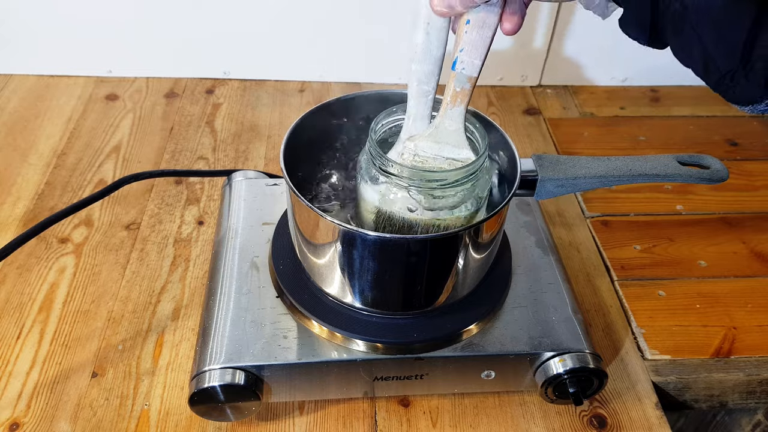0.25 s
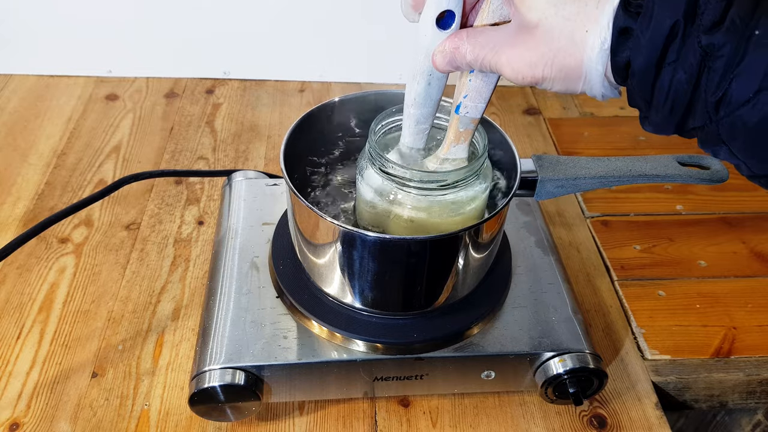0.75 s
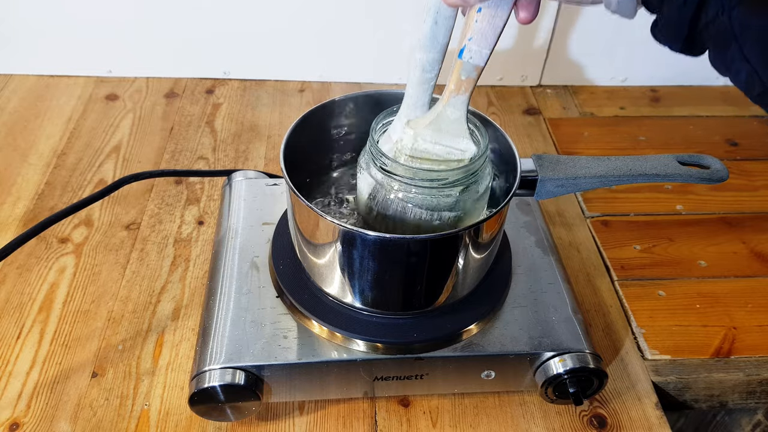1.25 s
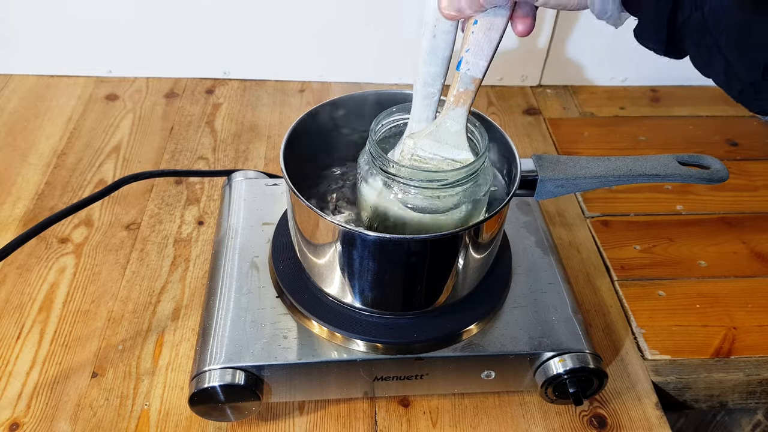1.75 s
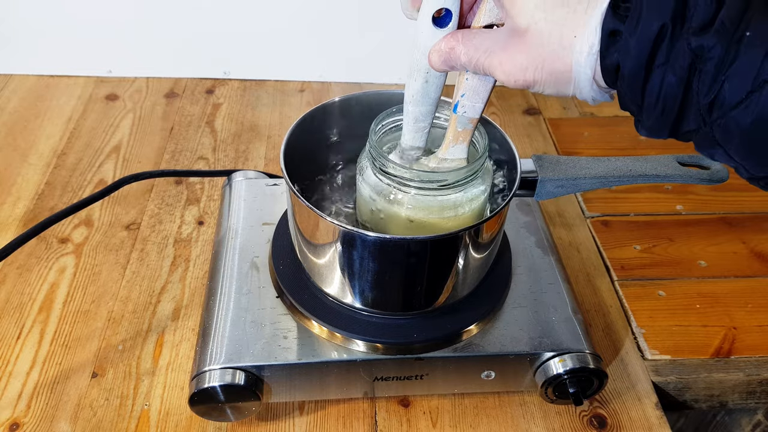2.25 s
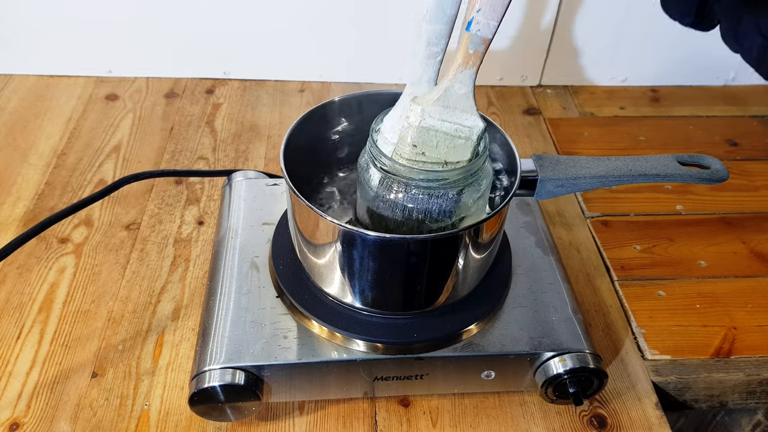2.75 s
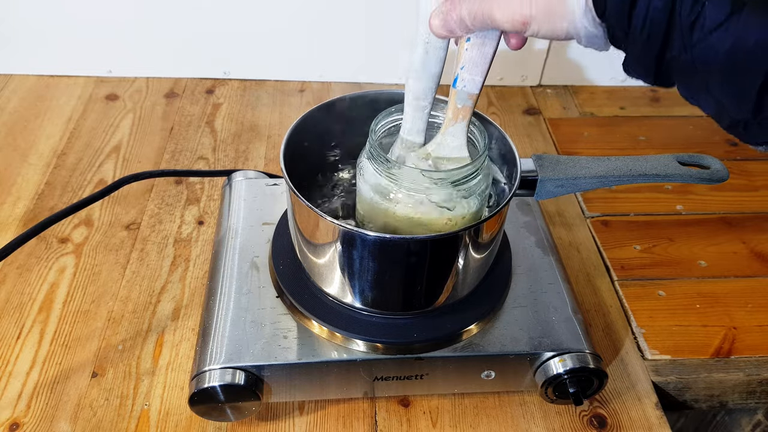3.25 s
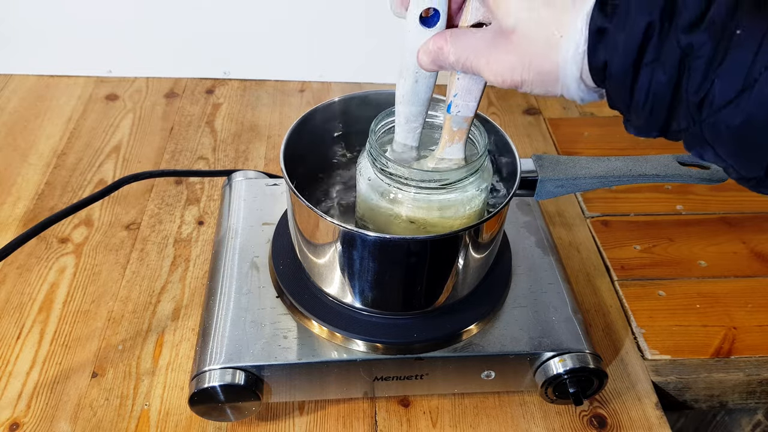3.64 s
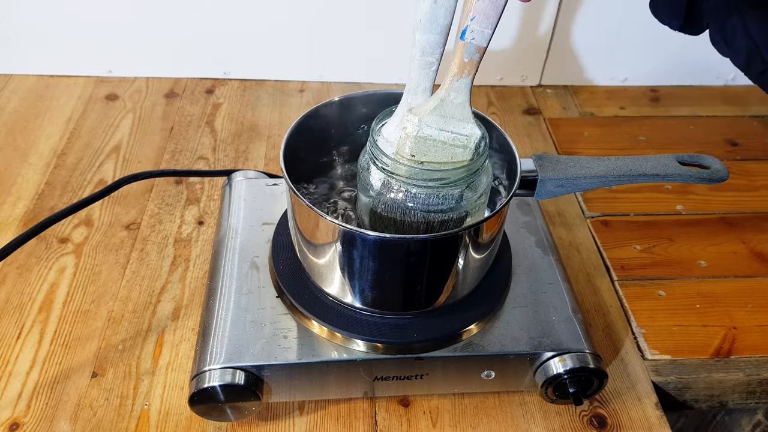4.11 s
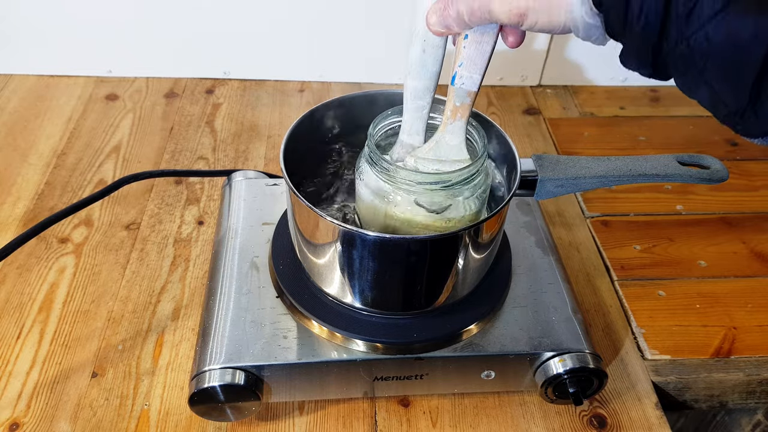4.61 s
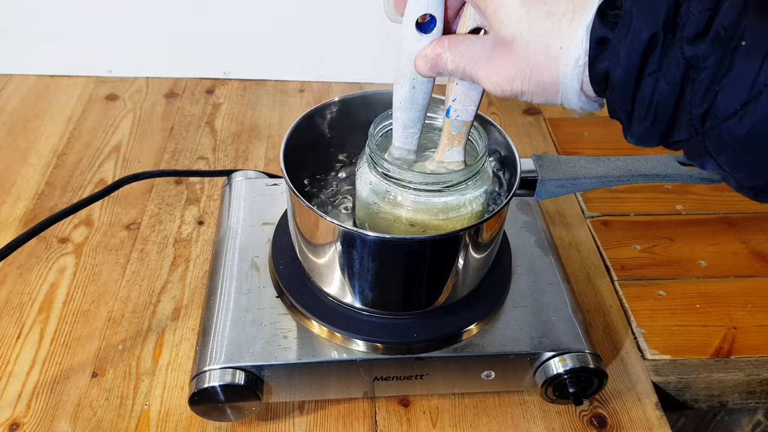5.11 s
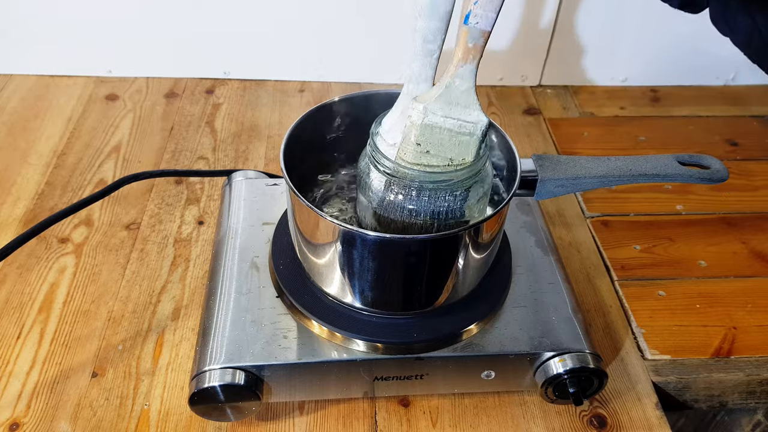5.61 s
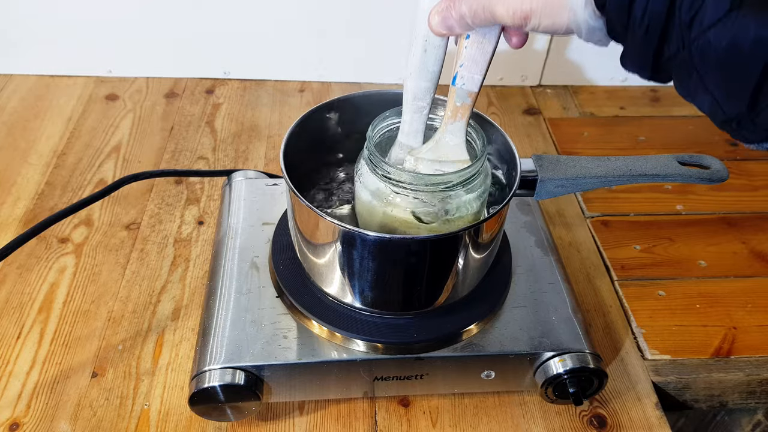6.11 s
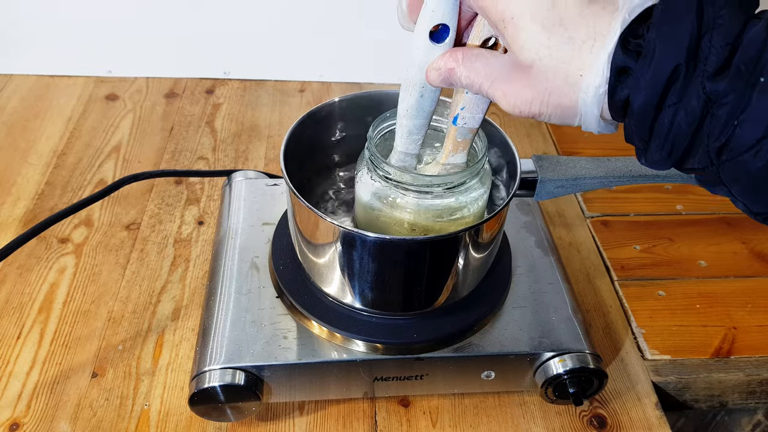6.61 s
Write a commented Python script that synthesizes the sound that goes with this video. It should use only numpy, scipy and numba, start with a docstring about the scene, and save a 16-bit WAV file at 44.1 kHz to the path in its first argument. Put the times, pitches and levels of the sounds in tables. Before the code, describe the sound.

Irregular muffled glass-on-steel clunks and small watery plops over a steady low bubbling rumble, heard close up in a small dry room.

```python
"""Brushes in a jar, simmering pan

Two brushes are pumped up and down in a glass jar, standing in a steel pan of simmering water on a hot plate.
Close two-port microphone in a small room. Chance clicks through resonant filters make the rumble and drumming
of vapour bubbles; decaying modes make the jar's knocks on the pan; gliding sines make plops and gurgle;
filtered noise makes steam, ticks of spray and longer spurts.
"""
import sys
import numpy as np
from scipy import signal
from scipy.io import wavfile
from scipy.ndimage import uniform_filter1d
from numba import njit

SR = 44100
rng = np.random.default_rng(int(sys.argv[2]) if len(sys.argv) > 2 else 0)


def persist_wave(psi):
    """Save psi, clipped to +-1, as 16-bit WAV."""
    counts = np.round(np.clip(psi, -1, 1) * 32767).astype(np.int16)
    wavfile.write(sys.argv[1], SR, np.atleast_2d(counts).T)


N = 302526  # samples

# jar meets pan: [t/s, peak level of the pan floor/dB, share of the ring time,
# then level against the floor/dB of: plate thud, pan wall, glass, crack]
KNOCKS = [(.161, -24.5, 0.39, -22, -5.5, -2.5, -12.5), (.186, -41, 1.1, -1, -2, -17, -25),
          (.222, -44, 0.5, -18, 7, -12, -25), (.209, -37.5, 1.2, 1, 1.5, -8, -33),
          (.234, -40.5, 1.4, 0, -15, -10, -9), (0.355, -38.5, 0.66, -6, -2.5, -43, -25),
          (.442, -26.5, 0.44, -20, -42, -23, -22), (.744, -37.5, 0.22, -5, -31, -7, -9.5),
          (.961, -37.5, 0.53, -5.5, -20, -22, -38), (1.173, -32.5, 0.69, -31, 1.5, -7, -19),
          (1.195, -33.5, 0.76, -40, -38, -27, -16), (1.294, -32.5, 0.27, -21, -11, -14, -32),
          (1.31, -37.5, 1.3, -5.5, 1, -23, -15), (1.445, -50, 0.85, 3, -17, -24, -32),
          (1.569, -44.5, 1, -7, -1, -7, -27), (1.62, -34, 0.41, -7, -28, -24, -37),
          (1.713, -56, 1.6, -12, 9.5, -16, -27), (1.845, -41, 0.4, -3, -7, -26, -28),
          (2.448, -58, 0.55, -25, 13, 13.5, 7), (2.52, -31, 0.41, -20, 0.5, -11.5, -15),
          (2.62, -35, 0.93, -14, -14, -8.5, -17), (2.648, -30.5, 0.6, -16, 2, -7.5, -13.5),
          (2.781, -46, 1.2, -8, -7, -9, -23), (2.929, -40, 0.88, -27, -4, -12, -29),
          (3.024, -29, 0.76, -40, -8, -2.5, -19.5), (3.162, -40.5, 0.43, -20, -27, -31, -29),
          (3.259, -53.5, 0.6, 4.5, 5, 3, -27), (3.291, -34.5, 0.65, -31, 4, -5.5, -13.5),
          (3.505, -39.5, 0.88, -18, -11, -8, -25), (3.905, -33.5, 0.29, -32, -2, -14, -26),
          (3.997, -38.5, .6, -5, -1, -5, -7.5), (4.012, -39, 0.47, -13, -4, -8, -15),
          (4.029, -41, 1.7, -2.5, -8, -10, -16), (4.167, -47, 1.6, -24, -7, -27, -25),
          (4.436, -27.5, 0.52, -50, -8.5, -3, -8), (4.48, -38.5, 1.6, -41, -20, -27, -10),
          (4.52, -47, 1.3, -22, -13, -15, -25), (4.949, -47, 0.76, -15, 0, -2, -29),
          (5.025, -53.5, 0.71, 10.5, -6, -22, -19), (5.114, -53, 0.65, 1, -7, -32, -30),
          (4.642, -54, 0.42, -17, -15, -31, -14), (5.287, -31, 0.19, -37, -3.5, -10, -16.5),
          (5.376, -36.5, 0.24, -33, -19, -14, -18), (5.401, -30.5, 0.36, -33, -1.5, 0.5, -22),
          (5.425, -28, 0.43, -41, 8, -1, -4.5), (5.689, -46, .7, -6, -16, -36, -28),
          (5.71, -43, 1.3, -14, -17, -28, -30), (5.917, -29, 1, -38, -7, -6.5, -18),
          (5.958, -39.5, 0.87, 5, -5, -18, -10), (5.981, -29.5, 0.38, -13, 2.5, -6, -10.5),
          (6.3, -44, 0.7, -24, -3, -12, -12), (6.395, -40.5, 1.1, -26, -4, -33, -29),
          (6.553, -45, 1.7, 4, -23, -15, -32), (6.659, -54.5, 0.99, 9, 2, -4, -24),
          (6.758, -55, 1.4, 6, 6, 2.5, -19)]
# trapped air plops: [t/s, peak level/dB, starting f/Hz, glide over one t60/octaves (negative falls)]
PLOPS = [(0.213, -53, 1140, -0.12), (0.233, -45, 1630, -0.15), (.25, -51, 1600, .05),
         (0.373, -54, 2730, 1.6), (.528, -42, 1314, -0.87), (0.956, -46, 1233, 0.013),
         (1.101, -48.5, 1226, .05), (3.434, -58, 1330, 1.2), (4.641, -43, 478, 0.93),
         (4.717, -49, 500, 1.54), (5.376, -46, 1815, 0.64), (6.15, -62, 2800, 0),
         (6.186, -66, 1750, -0.052), (6.304, -59, 1860, -0.13), (6.397, -54, 1310, 0),
         (0.371, -39.5, 2600, 0.2), (.381, -62, 3620, -0.24), (.465, -49, 2000, -0.17),
         (0.515, -42, 1457, -1.16), (0.589, -40, 1270, 0.012), (.62, -44.5, 1416, -0.71),
         (1.278, -44.5, 1810, -0.31), (2.829, -55, 1960, 0.61), (3.316, -43.5, 3140, 0.33),
         (3.318, -38.5, 1790, -0.58), (3.346, -35.5, 1855, 0.46), (3.359, -36.5, 3670, -0.71),
         (3.365, -53, 3300, -0.0055), (3.53, -48, 1490, 0.37), (5.296, -37, 1153, 0.17),
         (3.408, -44.5, 2020, 0.32), (3.417, -35, 10960, -0.019), (3.436, -50, 10900, -0.1),
         (3.538, -53, 4470, 0.27), (3.44, -49, 1780, 1), (3.505, -39, 1270, 0.36), (3.518, -37, 1045, 0.76),
         (4.592, -37, 1723, 0.36), (4.644, -57, 1730, -.19), (4.717, -47, 3360, -0.035),
         (4.765, -49, 1460, 1.03), (4.948, -60, 1850, -0.31), (5.129, -47, 10900, -0.39),
         (5.403, -29, 1810, 1), (5.545, -51, 1930, -0.19), (6.135, -59, 2680, 0.13),
         (6.175, -45, 8270, -0.22), (6.176, -60, 2560, -0.038), (6.227, -48, 1350, 1),
         (6.24, -49, 1690, .2), (6.299, -44.5, 10400, 0)]
# spray bursts at the surface: [t/s, peak level before panning/dB, f/Hz, left minus right/dB]
TICKS = [(0.436, -45, 9300, -5), (.542, -52, 5000, -9), (0.56, -48, 10200, -3), (.863, -45, 12200, 6),
         (1.279, -49, 4720, -3), (1.339, -49, 10900, -3), (1.388, -52, 10800, 4), (1.505, -44, 12200, 7),
         (1.534, -34, 10800, 7), (1.681, -42, 10800, -1), (1.882, -48, 10900, -3), (1.94, -47.5, 6220, -6),
         (1.996, -43, 13900, -8), (3.1, -38, 12700, 2), (3.164, -45, 5840, -5), (3.176, -42, 12400, -1.5),
         (3.357, -50, 4130, -11), (3.386, -46, 6360, -1.5), (3.472, -48, 9000, -1.5),
         (3.543, -46, 9680, -2), (4.488, -49, 11000, -6), (4.534, -42.5, 12200, 2), (4.592, -50, 11940, -6),
         (4.696, -49, 10900, -8), (5.195, -47, 13700, -.5), (5.376, -46.5, 6750, 1),
         (6.067, -48, 12800, -3), (6.126, -50, 6500, -9), (6.204, -50, 2600, -2), (6.203, -46, 11900, -3),
         (6.267, -47, 12600, -7), (6.274, -53, 10300, -19), (6.662, -47, 9900, 4), (.075, -47, 11000, -2),
         (.228, -56, 11100, -2), (1.019, -51, 14000, -2), (2.879, -48, 12300, -3), (4.809, -50, 5840, -7),
         (5.168, -49, 8200, -2), (5.949, -50, 8000, -2), (6.249, -54, 5980, -6), (2.122, -55, 2300, -4),
         (1.94, -50, 2100, 0)]
# modes of pan, water and jar together, the shortest being the dull thud of the whole:
# [f/Hz, relative level/dB, unshortened t60/s]
BODY_MODES = [(183, -5, 0.11), (262, 5, 0.076), (378, -5.5, 0.12), (427, 7, 0.023), (483.3, -6.5, 0.17),
              (549, -1, 0.11), (593, -9, 0.67), (702, 10, 0.0083), (860, -11.5, 0.17), (958.3, -6.5, 0.29),
              (1038.4, 4.5, 0.079), (1167, 2, 0.037), (1301, 0.5, 0.029), (1847, 17.5, 0.017),
              (1930, -27, 0.029), (1895, 4, 0.011), (2140, 4, 0.046), (2310, -10, 0.2), (2770, -15, 0.024),
              (3140, -3, 0.087), (4540, 0, 0.035), (5050, 0, 0.024)]
# pitch ranges of pan floor, plate thud, pan wall, glass, crack: [lowest f/Hz, highest f/Hz]
KNOCK_PARTS = ((330, 750), (120, 330), (750, 1400), (1400, 2800), (2800, 9500))
# resonances of plate and table top: [f/Hz, half the width of each of two filters in series/Hz, relative level/dB]
TABLE_MODES = [(50.1, 9.4, -4), (71.1, 11.4, 2.5), (99, 13.2, -0.5), (124.6, 38.5, -10.5)]
# spectrum of steam and air: [f/Hz, relative level per Hz/dB]
HISS_SPECTRUM = [(1530, -36), (2600, 0), (3090, -0.5), (3600, -11), (4900, 2), (7540, -6.5), (8190, -2),
                 (11100, 6), (15100, 2.5), (15800, -7)]
# course of the simmer: [t/s, rumble through the table/dB, drumming on the pan/dB, sloshing water/dB]
SIMMER = [(0.0, -43.5, -55.5, -64), (0.23, -44, -57.5, -73), (0.36, -42.5, -52, -64),
          (1.01, -45.5, -57, -71.5), (1.22, -42.5, -61, -65), (1.36, -43, -51.5, -63.5),
          (1.83, -45.5, -55, -85), (1.87, -41, -53.5, -69), (2.23, -48.5, -57.5, -79.5),
          (2.46, -52, -55.5, -74), (2.67, -39.5, -52, -74), (2.83, -46.5, -54, -79),
          (3.02, -41.5, -48, -68), (3.23, -51.5, -62, -80), (3.28, -39, -51.5, -71), (3.4, -42.5, -52, -66),
          (3.69, -48, -58.5, -81), (3.9, -49, -57, -75), (4.07, -41.5, -52.5, -80), (4.18, -49.5, -57, -80),
          (4.34, -41, -57, -76), (4.64, -44.5, -56, -68.5), (5.04, -50, -58.5, -85),
          (5.27, -43.5, -55.5, -75), (5.46, -44, -50.5, -68), (5.66, -49, -57, -79),
          (5.84, -47, -50.5, -82), (5.88, -44.5, -57.5, -68), (6.0, -43, -47.5, -102),
          (6.11, -45, -56, -69), (6.4, -51, -56, -80), (6.86, -48.5, -58, -83)]
# the table top booms under a push of the hand: [t/s, peak level/dB, f/Hz]
BOOMS = [(.19, -33.5, 71), (1.461, -42, 67.6), (1.85, -32, 69.3), (2.96, -36.5, 73.7), (3.27, -40, 69),
         (4.03, -40.5, 65.8), (4.3, -35.5, 74.2), (4.418, -39, 73.5), (4.56, -35, 72.6), (5.41, -38.5, 72),
         (5.79, -38, 73.4), (5.96, -31.5, 71.6), (6.28, -44, 69.8)]
# longer hisses of spray and sloshing: [t/s, peak level before panning/dB, time scale/s, lowest f/Hz, highest f/Hz]
SPURTS = [(0.976, -53.5, 0.028, 4000, 9500), (2.773, -54, 0.071, 1600, 2270),
          (3.717, -46, 0.027, 4160, 15000), (3.996, -52, .05, 6000, 14000), (4.723, -57, 0.038, 2820, 3900),
          (5.509, -51, .07, 1700, 2190), (6.262, -51, 0.025, 4000, 15000)]

SWELL_DB, SLOSH_WANDER_DB = 2.5, 2.0  # chance swell of each drumming mode and of the sloshing
GLUG_DB = -7  # large bubbles against the drumming
HISS_DB, FIZZ_DB = -64, -15  # steam overall; fizz against the noise inside it
SPLASH_DB, SPLASH_SHARE, SPLASH_WANDER_DB = -79.5, 0.28, 2.2  # level, share of the slosh swing, chance wander
SPRAY_DB, SPRAY_S, SNAP_S = -15, 0.006, 0.0006  # wisp against the click, wisp decay, rise of the click
ROOM_T60_S, ROOM_DB = 0.12, -9
# spread of mode levels and relative pitches; each mode builds up over this many cycles under the soft push
MIX_DB, DETUNE, CONTACT_TURNS = 3, 0.022, 0.7
# the hand and the wet contact cap ring times; above 1 kHz the cap shrinks by this power of pitch
RING_MOST_S, WET_POWER = 0.16, 1.3
RATTLE, RATTLE_S = 0.15, 0.036  # strength and decay of the jar's chatter
CRACK_S, CLACK = 0.006, 1.6  # decay of the dry burst; its strength among the glass modes
SCRAPE_DB, SCRAPE_S = -17, 0.029  # the jar grinds on after a blow: level against each part, decay
# water stirred by each knock: level against the glass ring, rise and settling time
STIRRED_DB, STIR_RISE_S, SETTLE_S = -23, 0.0058, 0.032
SHAKEN_DB = -25  # extra drumming after a knock, against its peak
BOOM_RISE_S, BOOM_FADE_S = 0.015, 0.061
PLOP_T60_S, PLOP_SHORTENS = 0.092, 0.76  # at 1 kHz; power of pitch by which smaller bubbles die sooner
LEFT_RIGHT = np.array([[1], [-1]])


def undb(db):
    """dB to gain."""
    return 10 ** (np.asarray(db) / 20)


def level(x, db):
    """Scale to an rms level."""
    return x * undb(db) / np.sqrt(np.mean(x ** 2))


def peak(x, db):
    """Scale to a peak level."""
    return x * undb(db) / np.abs(x).max()


def add(out, s, sound):
    """Mix a short sound in at time s."""
    start = int(s * SR)
    piece = out[..., start:start + sound.shape[-1]]
    piece += sound[..., :piece.shape[-1]]


def times(seconds):
    """Sample times in s."""
    return np.arange(int(seconds * SR)) / SR


@njit
def svf(x, hz, width):
    """State-variable band-pass, gain 1 at the centre."""
    y, b, l = np.empty(len(x)), 0., 0.
    g, k = np.tan(np.pi * hz / SR), width / hz
    for i in range(len(x)):
        v = (b + g * (x[i] - l)) / (1 + g * (g + k))
        b, l, y[i] = 2 * v - b, l + 2 * g * v, k * v
    return y


def band(x, lo_hz, hi_hz):
    """Steep band-pass."""
    return signal.sosfilt(signal.butter(3, (lo_hz, hi_hz), "band", fs=SR, output="sos"), x)


def walk(rate):
    """Random levels held 1 / rate s and smoothed twice; spread near 1."""
    k = int(SR / rate)
    steps = np.repeat(rng.standard_normal(N // k + 1), k)
    return 1.58 * uniform_filter1d(uniform_filter1d(steps, k), k)[:N]


def grains(rate, spread_db):
    """Clicks at random moments, rate per second, most small and a few large."""
    happens = rng.random(N) < rate / SR
    sizes = undb(spread_db * np.minimum(rng.exponential(size=N), 3.0))
    return happens * rng.standard_normal(N) * sizes


def rumble():
    """Collapsing vapour bubbles shake the resonances of plate and table top without a break."""
    mid, side = (grains(rate=1200, spread_db=1.5) for _ in range(2))
    ports = []
    for shake in mid + 0.095 * side * LEFT_RIGHT:
        port = 0
        for hz, half_width, db in TABLE_MODES:
            once = svf(shake, hz, 2.0 * half_width)
            port = port + undb(db) * svf(once, hz, 2.0 * half_width) / np.sqrt(half_width)
        ports.append(port)
    out = np.array(ports)
    # the simmer table sets the loudness, so slow chance swells are partly evened out
    swell = uniform_filter1d(uniform_filter1d((out ** 2).mean(0), size=3000), size=3000)
    return level(out / swell ** 0.3, 0)


def drumming(lo_hz, hi_hz, tilt_db, wide):
    """Bubble collapses and the water ring the modes between two pitches, each swelling on its own."""
    out = 0
    # soft pushes from all over the pan floor: the two ports hear slightly different sets
    mid, side = (band(grains(rate=1000, spread_db=1.5), lo_hz, hi_hz) for _ in range(2))
    for hz, db, t60 in BODY_MODES:
        if lo_hz <= hz < hi_hz:
            width = np.log(1000) / np.pi / t60
            tilt = tilt_db * np.log2(hz / lo_hz)
            gain = undb(db + tilt + SWELL_DB * walk(9)) / width
            apart = wide * hz / hi_hz * svf(side, hz, width)
            out = out + gain * (svf(mid, hz, width) + apart * LEFT_RIGHT)
    return level(out, 0)


def gurgle(count, lo_hz, octaves, cycles, glide):
    """Small bubbles ring as short, slightly rising sines at random moments, pitches and places."""
    out = np.zeros((2, N))
    for when, pitch, size, place, rise in rng.random((count, 5)):
        hz = lo_hz * 2 ** (octaves * pitch)
        turns = np.arange(int(3 * cycles * SR / hz)) * hz / SR
        blip = np.sin(2 * np.pi * turns * (1 + glide * rise * turns)) * np.exp(-2 * turns / cycles)
        size_db = -4 * np.log(1 - .97 * size)
        side_db = 3.0 * (place - 2.5) * LEFT_RIGHT  # 9 to 15 dB stronger on the right
        add(out, when * N / SR, blip * undb(size_db + side_db))
    return level(out, 0)


def hiss(splash_db):
    """Bands of steam with fine fizz, unrelated left and right; splashing lifts the lower ones most."""
    out, (f, density_db) = 0, np.transpose(HISS_SPECTRUM)
    fizz = [level(grains(rate=380, spread_db=3.0), FIZZ_DB) for _ in range(2)]
    breath_db = 1.06 * walk(13) + 0.27 * walk(3.02)
    for hz in 2600 * 2 ** np.arange(0, 2.7, 1 / 4):  # quarter-octave steps
        lift_db = splash_db * min((4500 / hz) ** 2.7, 1)
        db = np.interp(np.log(hz), np.log(f), density_db) + lift_db + breath_db + 0.89 * walk(17)
        out = out + undb(db) * np.array([svf(rng.standard_normal(N) + z, hz, hz / 5) for z in fizz])
    return level(band(out, 2300, 20000), HISS_DB) * undb([[-.5], [.5]])


def ticks():
    """Spray ticks: a band-limited noise click with a wisp of wider noise behind it."""
    out, t = np.zeros((2, N)), times(.08)
    for s, db, hz, pan_db in TICKS:
        wisp = undb(SPRAY_DB) * rng.standard_normal((2, len(t))) * np.exp(-t / SPRAY_S)
        click = rng.standard_normal(len(t)) * t / SNAP_S * np.exp(1 - t / SNAP_S)
        burst = band(wisp + click, 0.7 * hz, min(1.58 * hz, .45 * SR))
        add(out, s, peak(burst, db) * undb(pan_db * LEFT_RIGHT / 2))
    return out


def room(x):
    """Small room: scattered reflections as decaying noise, a different set at each port."""
    t = times(.3)
    tail = rng.standard_normal((2, len(t))) * np.exp(-np.log(1000) * t / ROOM_T60_S) * (t > .002)
    tail = signal.sosfilt(signal.butter(1, 500, "high", fs=SR, output="sos"), tail)
    tail = tail * undb(ROOM_DB) / np.sqrt((tail ** 2).sum(1, keepdims=True))
    return signal.fftconvolve(x[None], tail)[:, :N]


def knocks():
    """Each blow and its uneven rattle set the modes ringing, in a fresh mix, out of step at the two ports."""
    out, t = np.zeros((2, N)), times(.15)
    hz, db, free_t60 = np.transpose(BODY_MODES)
    for s, peak_db, lasts, *shares_db in KNOCKS:
        mix = rng.standard_normal((4, len(hz)))
        longest = RING_MOST_S * np.minimum(1000 / hz, 1) ** WET_POWER
        t60 = np.minimum(free_t60, longest) * np.clip(lasts, .15, 1.5) * 2 ** (0.32 * mix[3])
        turn = np.outer(2 * np.pi * hz * (1 + DETUNE * mix[1]), t)
        # higher modes reach the two ports further out of step
        lead = (0.29 * mix[2] * np.sqrt(hz / 1000))[:, None] * LEFT_RIGHT[:, :, None]
        decay = np.exp(-np.log(1000) * t / t60[:, None])
        rings = undb(db + MIX_DB * mix[0])[:, None] * np.sin(turn + lead) * decay
        rings = rings * (1 - np.exp(-np.outer(hz, t) / CONTACT_TURNS))
        # the first blow, then chance lighter ones
        rattles = rng.random(len(t)) < .015
        blow = RATTLE * rng.standard_normal(len(t)) * rattles * np.exp(-t / RATTLE_S)
        blow[0] = 1
        roughness_db = 25 * uniform_filter1d(rng.standard_normal(len(t)), size=100)
        grit = rng.standard_normal((2, len(t))) * undb(roughness_db)
        scrape = grit[0] + .25 * grit * LEFT_RIGHT
        scrape = scrape * (1 - np.exp(-t / 0.0023)) * np.exp(-t / SCRAPE_S)
        # the hard contact itself: a dry burst that joins one glass mode and the topmost mode
        crack = np.exp(-t / CRACK_S)
        rings[:, hz.searchsorted(2000)] += CLACK * rng.standard_normal((2, len(t))) * crack
        rings[:, -1] += rng.standard_normal((2, len(t))) * crack
        for (lo, hi), share_db in zip(KNOCK_PARTS, (0, *shares_db)):
            part = rings[:, (hz >= lo) & (hz < hi)].sum(1)
            ring = signal.fftconvolve(part, blow[None])[:, :len(t)]
            add(out, s, peak(band(ring, 1.047 * lo, 1.06 * hi), peak_db + share_db))
            add(out, s, peak(band(scrape, lo, hi), peak_db + share_db + SCRAPE_DB))
    return out


def stirred(peaks_db):
    """Motion left in the water: it rises after each knock and settles again."""
    kicks, t = np.zeros(N), times(.8)
    np.add.at(kicks, (np.transpose(KNOCKS)[0] * SR).astype(int), undb(peaks_db))
    motion = (1 - np.exp(-t / STIR_RISE_S)) * np.exp(-t / SETTLE_S)
    return np.abs(signal.fftconvolve(kicks, motion)[:N])


def booms():
    """A soft push swings a low table mode up, then it dies away."""
    out, t = np.zeros(N), times(.4)
    for (s, db, hz), start in zip(BOOMS, rng.random(len(BOOMS))):
        shape = (1 - np.exp(-t / BOOM_RISE_S)) ** 2 * np.exp(-(t / BOOM_FADE_S) ** 1.4)
        add(out, s, peak(shape * np.sin(2 * np.pi * (hz * t + start)), db))
    return out


def plops():
    """A bubble is a short, unsteady sine that glides up or down, born in a small splash."""
    out, t = np.zeros(N), times(.1)
    for s, db, hz, rise in PLOPS:
        t60 = PLOP_T60_S * (1000 / hz) ** PLOP_SHORTENS
        phase = 2 * np.pi * np.cumsum(hz * 2 ** (rise * np.minimum(t / t60, 1))) / SR
        smooth = 2.5 * SR / hz  # two and a half cycles, in samples
        wobble = uniform_filter1d(rng.standard_normal((2, len(t))), int(smooth)) * np.sqrt(smooth)
        shape = (1 - np.exp(-t / 0.00026)) * np.exp(-np.log(1000) * t / t60)
        tone = (1 + 0.5 * wobble[0]) * np.sin(phase + 0.27 * wobble[1]) * shape
        splash = band(rng.standard_normal(len(t)), 0.4 * hz, min(1.28 * hz, .45 * SR))
        splash = splash * np.exp(-t / (1.1 * t60))
        add(out, s, peak(tone + peak(splash, -22.5), db))
    return out


def spurts():
    """Spray and sloshing as broad noise that swells and fades, 3 dB to the right."""
    out = np.zeros((2, N))
    for s, db, length, lo_hz, hi_hz in SPURTS:
        turn = np.arange(int(1.6 * length * SR)) / (length * SR)
        noise = rng.standard_normal(len(turn)) + rng.standard_normal((2, len(turn)))
        burst = noise * turn * np.exp(-2.5 * turn ** 2)
        add(out, s, peak(band(burst, lo_hz, min(hi_hz, .45 * SR)), db) * undb([[-1.5], [1.5]]))
    return out


def scene():
    """Simmer, knocks, plops and booms lean 0.9 dB left; spray and steam keep their own places; the room answers."""
    s, *columns = np.transpose(SIMMER)
    rumble_db, drum_db, slosh_db = (np.interp(np.arange(N) / SR, s, c) for c in columns)
    _, floor_db, _, _, _, glass_db, _ = np.transpose(KNOCKS)
    slosh = undb(slosh_db) + stirred(floor_db + glass_db + STIRRED_DB)
    slosh = slosh * undb(SLOSH_WANDER_DB * walk(11))
    drum = undb(drum_db + 0.31 * walk(10.0)) + stirred(floor_db + SHAKEN_DB)
    splash_db = SPLASH_SHARE * 20 * np.log10(slosh / slosh.mean()) + SPLASH_WANDER_DB * walk(6.75)

    steady = undb(rumble_db) * rumble()
    steady += drum * drumming(180, 1223, tilt_db=-0.46, wide=0.71)
    steady += slosh * drumming(1430, 2420, tilt_db=-.3, wide=1.0)
    ripples = gurgle(count=500, lo_hz=1350, octaves=1.0, cycles=11.0, glide=0.0064)
    steady += slosh * undb(-18.0) * ripples
    glugs = gurgle(count=450, lo_hz=322.7, octaves=1.6, cycles=22.0, glide=0.0172)
    steady += drum * undb(GLUG_DB) * glugs
    splashes = gurgle(count=1100, lo_hz=2870, octaves=2.04, cycles=27, glide=0.0042)
    steady += undb(SPLASH_DB + splash_db) * splashes

    struck = knocks() + plops() + booms()
    spray = ticks() + spurts()
    direct = (steady + struck) * undb(.45 * LEFT_RIGHT) + spray
    return direct + room((struck + spray).mean(0)) + hiss(splash_db - splash_db.mean())


def record(dry):
    """The recorder rolls off the deepest bass and cuts the top at 16 kHz."""
    dry = signal.sosfilt(signal.butter(5, 38, "high", fs=SR, output="sos"), dry)
    return signal.sosfilt(signal.ellip(10, .2, 70, 16000, fs=SR, output="sos"), dry)


dry = scene()
out = record(dry)
persist_wave(out)
```